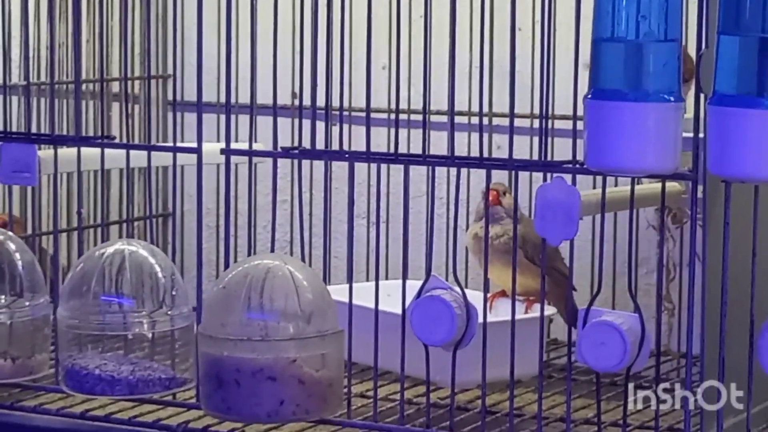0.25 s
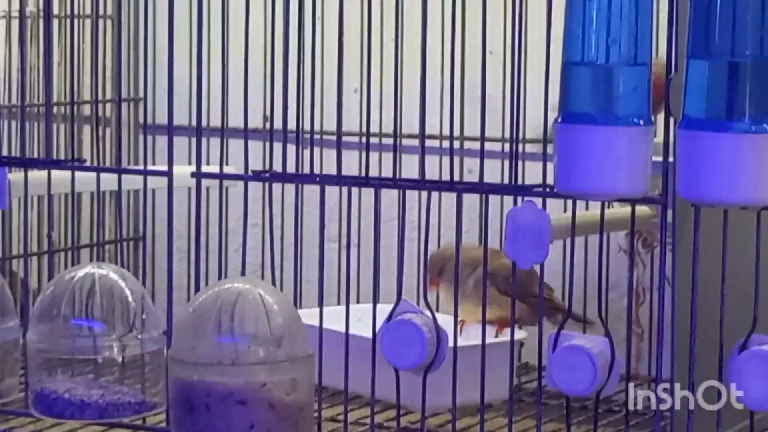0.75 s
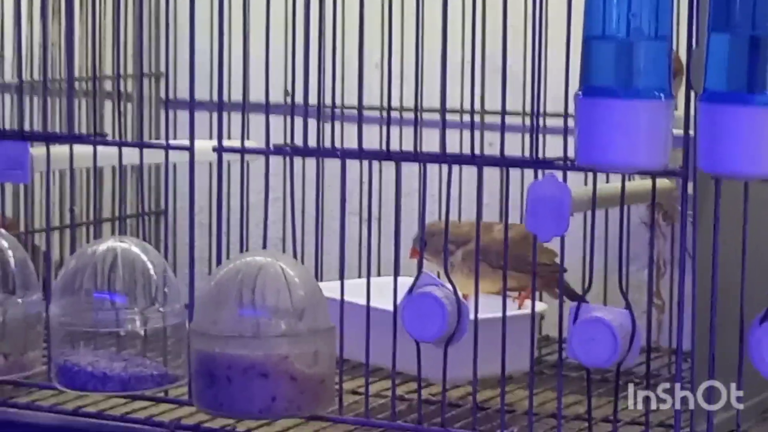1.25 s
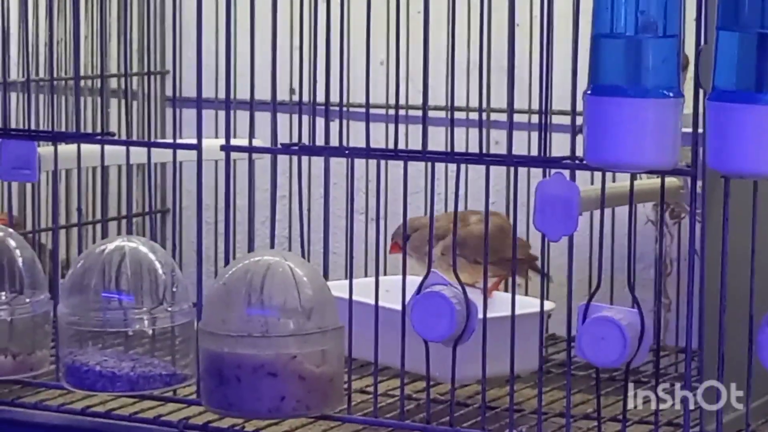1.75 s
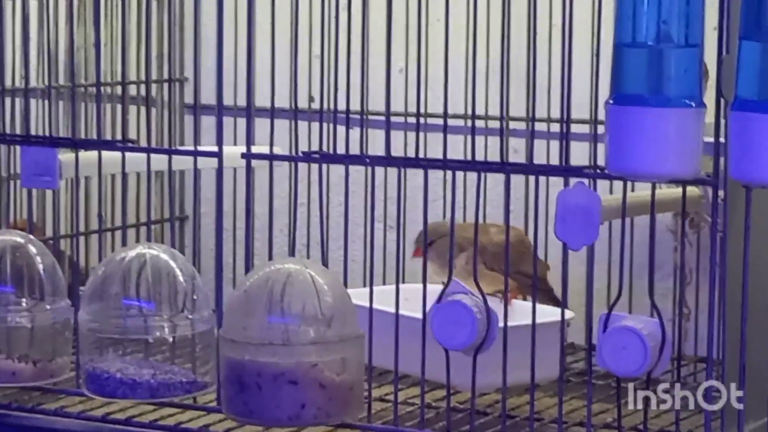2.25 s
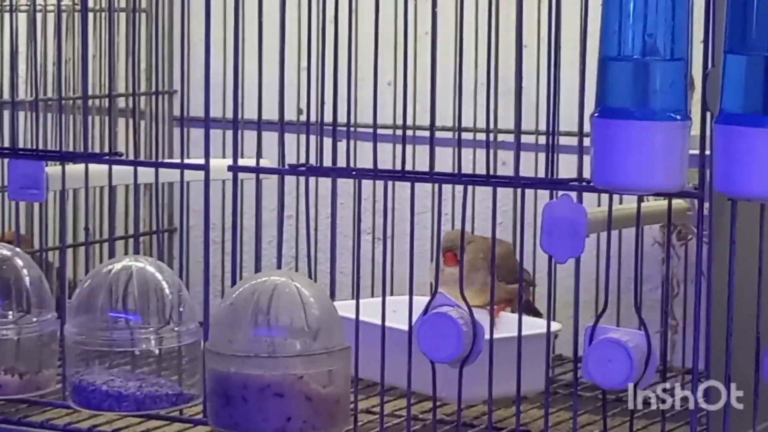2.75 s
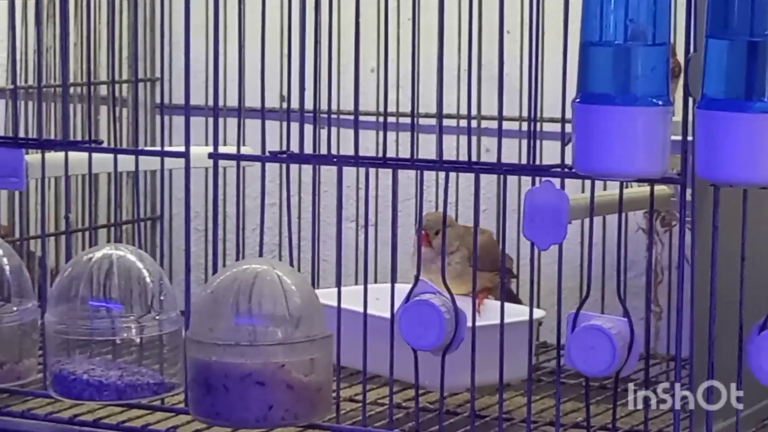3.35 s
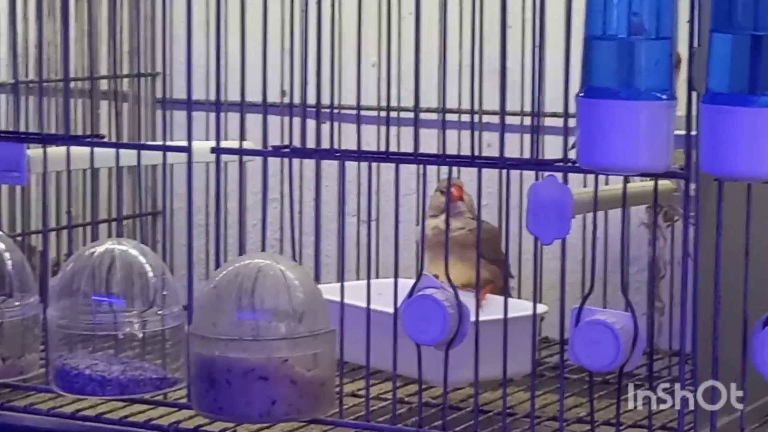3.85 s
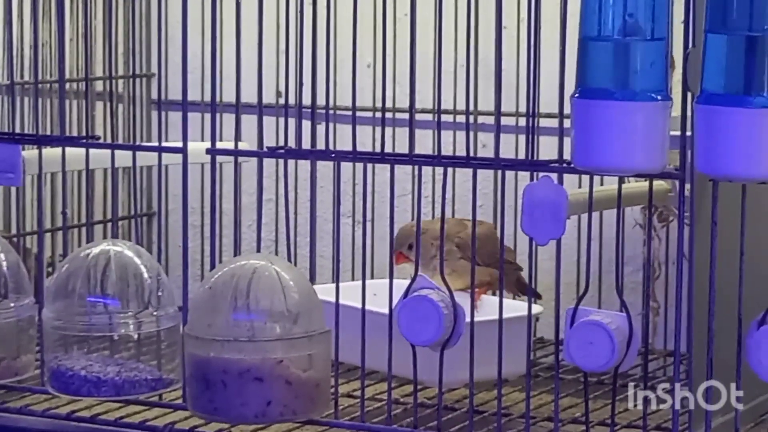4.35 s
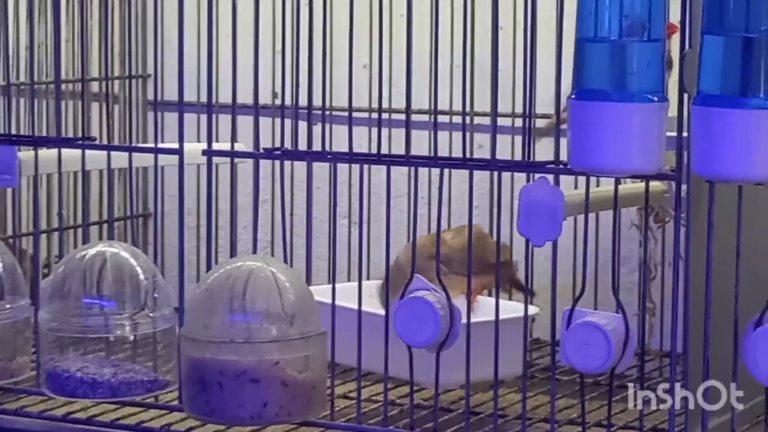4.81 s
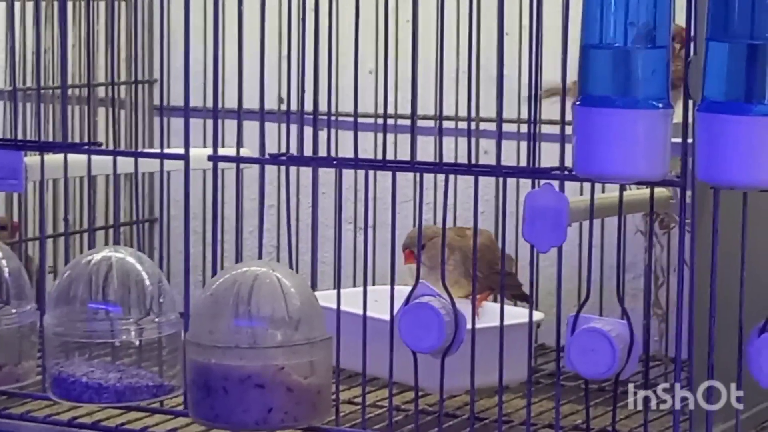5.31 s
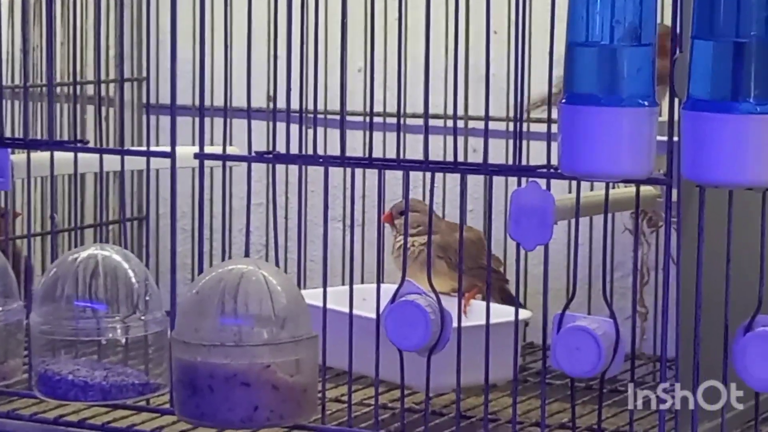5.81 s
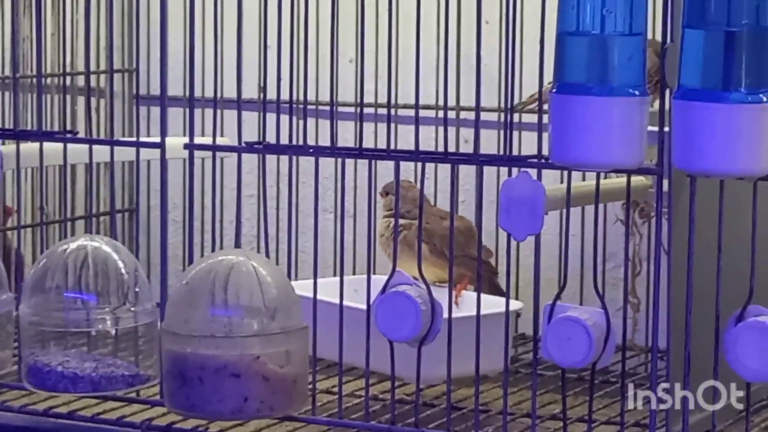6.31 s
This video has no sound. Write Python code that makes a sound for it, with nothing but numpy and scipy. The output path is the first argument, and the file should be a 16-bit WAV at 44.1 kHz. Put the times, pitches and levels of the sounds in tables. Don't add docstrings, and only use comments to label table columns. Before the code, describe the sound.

Several small finches call inside wire cages in a small hard-walled room. A short falling chirp opens, then soft distant chirps and a breathy phrase lead into two long nasal beeps with reedy answers. A sharp diving call follows, the phrase returns, then three more long beeps and a loud plunging cry. Later come softer chirps, claw ticks and feather rustles. Low mains hum and faint hiss continue throughout, picked up by a close stereo microphone.

```python
import sys
import numpy as np
from scipy import signal
from scipy.fft import rfft, irfft
from scipy.io import wavfile
from scipy.ndimage import uniform_filter1d

SR = 44100
rng = np.random.default_rng(int(sys.argv[2]) if len(sys.argv) > 2 else 0)


def bounce(signal):
    frames = np.transpose(np.atleast_2d(signal))
    limited = np.clip(frames, -1, 1)
    pcm = np.round(limited * 32767).astype(np.int16)
    wavfile.write(sys.argv[1], SR, pcm)


def amplitude_ratio(level_db):
    exponent = np.asarray(level_db, float) / 20
    return 10 ** exponent


N = 289734

# pitch_jitter_share, breath_db
ROUGHNESS = dict(long=(.0045, -11.5), chirp=(.006, -9), far=(.008, -8), answer=(.006, -10),
             falling=(.005, -10), song=(.024, -1))


def evened(x):
    return x / np.sqrt(np.mean(x ** 2) + 1e-20)


def read(points, hz):
    f, value = np.transpose(points)
    return np.interp(np.log(hz + 1), np.log(f + 1), value)


def add(mix, start_s, sound):
    part = mix[:, round(start_s * SR):][:, :sound.shape[1]]
    part += sound[:, :part.shape[1]]


def drift(size, span_s):
    width = max(int(span_s * SR), 1)
    once = uniform_filter1d(rng.standard_normal(size), width)
    return evened(uniform_filter1d(once, width))


def sided(x, pan_db):
    return np.array([x * amplitude_ratio(pan_db / 2), x * amplitude_ratio(-pan_db / 2)])


def placed(mix, direct_db, wet_db):
    # pitch_hz, t60_s
    decay = [(500, 0.15), (1500, 0.42), (4000, 0.345), (8000, 0.28), (14000, 0.09)]
    left_lag = 10
    taps = np.zeros((2, SR // 2))
    jitter = rng.integers(0, 20, (2, (SR // 2 - 101) // 20))
    at = np.arange(100, SR // 2 - 20, 20) + jitter
    np.put_along_axis(taps, at, rng.choice([-1., 1.], at.shape), 1)
    hz, t, z = signal.stft(taps, SR, nperseg=256)
    t60 = read(decay, hz)[:, None]
    tail = signal.istft(z * amplitude_ratio(-60 * t / t60) / np.sqrt(t60), SR, nperseg=256)[1]
    tail *= amplitude_ratio(wet_db) / np.linalg.norm(tail[0])
    tail[0, left_lag] += amplitude_ratio(direct_db)
    tail[1, 0] += amplitude_ratio(direct_db)
    return signal.fftconvolve(mix, tail, axes=1)[:, :N]


def shaped(calls, manner, offset_s=0, lift_db=0):
    # attack_s, attack_depth_db, fade_db_per_s, scoop_share, scoop_s,
    # left_right_db, first_beak_hz, last_beak_hz
    manners = dict( long=(.004, -1, -26, .08, .012, -3, 3900, 3900),
               chirp=(.022, -12, -150, .06, .018, -7, 2800, 2250),
               wide_chirp=(.045, -20, -60, .001, .01, -4, 4600, 3300),
               answer=(.025, -5, -130, .02, .02, -1, 2400, 2900),
               wide_answer=(.04, -10, -120, .01, .02, 2, 3500, 3500),
               falling=(.022, -5, -50, .001, .01, -4, 5100, 4500),
               lead=(.024, -10, -170, .001, .01, -2, 2800, 3100),
               song=(.02, -9, -150, .05, .015, -2, 2400, 3000),
               drop=(.014, -7, -210, .001, .01, -2, 4000, 2800),
               far=(.03, -6, -230, .05, .015, -8, 2300, 1950),
               wide_far=(.028, -12, -120, .05, .015, -7, 3400, 1950),
               faint=(.03, -8, -90, .001, .01, -2, 3200, 3100))
    attack_s, attack_db, fade_db, scoop, scoop_s, pan_db, beak_hz, last_beak_hz = manners[manner]
    out = []
    for start, length, db, hz, last_hz in calls:
        u = np.linspace(0, 1, num=40)
        t = u * length
        pitch = hz * (last_hz / hz) ** u * (1 - scoop * np.exp(-t / scoop_s))
        rise_db = attack_db * np.maximum(1 - t / attack_s, 0)
        effort_db = db + lift_db + rise_db + fade_db * np.maximum(t - attack_s, 0)
        beak = beak_hz + (last_beak_hz - beak_hz) * u
        out.append(np.transpose([offset_s + start + t, pitch, effort_db, pan_db + 0 * t, beak]))
    return out


def call(rows, throat, jitter, breath_db, late_db, beak_db=8):
    beak_width, flutter_db, droop = .16, 2.5, .05
    rise_s, fall_s, top_hz = .008, 0.0059, 16500
    s, *columns = np.transpose(rows)
    t = np.arange(s[0], s[-1], 1 / SR)
    hz, effort_db, pan_db, beak_hz = (np.interp(t, s, c) for c in columns)
    hz = hz * (1 - droop * np.exp((t - s[-1]) / .012))
    turn = 2 * np.pi * np.cumsum(hz * (1 + jitter * drift(len(t), 0.0031))) / SR
    k = np.arange(1, 1 + int(top_hz / hz.min()))[:, None]
    flutter = drift((len(k), len(t)), 0.01)
    beak = np.exp(-(np.log(k * hz / beak_hz) / beak_width) ** 2)
    opening_db = late_db * np.exp(-((t - s[0]) / .025) ** 2)
    shape_db = read(throat, k * hz) + beak_db * beak
    shape_db = shape_db - opening_db * (1 - beak) + flutter_db * flutter
    tone = evened((amplitude_ratio(shape_db) * (k * hz < top_hz) * np.cos(k * turn)).sum(0))
    puffs = rfft((1 + np.cos(turn)) * rng.standard_normal(len(t)))
    throat_gain = amplitude_ratio(read(throat, np.fft.rfftfreq(len(t), 1 / SR)))
    breath = evened(irfft(puffs * throat_gain, len(t)))
    edge = np.clip(np.minimum((t - s[0]) / rise_s, (s[-1] - t) / fall_s), 0, 1)
    return sided((tone + amplitude_ratio(breath_db) * breath) * amplitude_ratio(effort_db) * edge, pan_db.mean())


def flock(calls, throat, jitter, breath_db, direct_db, wet_db, late_db=3):
    mix = np.zeros((2, N))
    for rows in calls:
        add(mix, rows[0][0], call(rows, throat, jitter, breath_db, late_db))
    return placed(mix, direct_db, wet_db)


def hum():
    # pitch_hz, level_db
    lines = [(76, -56), (100, -50.5), (150, -48.5), (200, -60.5), (250, -63), (297, -60), (350, -60.5)]
    t, out = np.arange(N) / SR, np.zeros((2, N))
    port_phase, port_db = np.array([[0], [.2]]), np.array([[-.4], [.4]])
    for hz, db in lines:
        turn = 2 * np.pi * hz * t + 0.29 * drift(N, 0.046) + rng.uniform(0, 2 * np.pi)
        swell = np.sqrt(2) * amplitude_ratio(db + 1.8 * drift(N, 0.027))
        out += swell * np.sin(turn + port_phase) * amplitude_ratio(port_db)
    return out


def air():
    # pitch_hz, likeness_share
    likeness = [(30, 0.67), (100, 0.91), (300, 0.77), (700, 0.17), (3000, 0.9)]
    # pitch_hz, density_db_per_hz
    room_noise = [(25, -56), (38, -47), (52, -9), (80, -4.5), (120, -18.5), (160, -7), (250, -9.5),
                  (357, -16.5), (430, -20.5),
                  (600, -33), (1000, -34), (1450, -45), (2150, -38), (2800, -45.5), (4000, -54), (6000, -60),
            (8500, -55.5), (10500, -64), (13500, -58), (15300, -57), (16500, -72)]
    # pitch_hz, left_right_db
    balance = [(400, -.5), (1000, -4), (16000, -4)]
    level_db = -51
    frames, hz = N // 512 + 5, np.fft.rfftfreq(2048, 1 / SR)
    a, b, c, d, patches = rng.standard_normal((frames, 1025, 5)).T
    patches = evened(uniform_filter1d(uniform_filter1d(patches, 16, 0), 5, 1))
    same = np.clip(read(likeness, hz), -1, 1)[:, None]
    left = a + 1j * b
    z = np.array([left, same * left + np.sqrt(1 - same ** 2) * (c + 1j * d)])
    z *= amplitude_ratio(read(room_noise, hz)[:, None] + 2.7 * patches)
    z *= amplitude_ratio(np.array([.5, -.5])[:, None, None] * read(balance, hz)[:, None])
    return amplitude_ratio(level_db) * evened(signal.istft(z, nperseg=2048, noverlap=1536)[1][:, :N])


def soft_chirps():
    # start_s, length_s, effort_db, first_pitch_hz, last_pitch_hz
    plain = [
        (1.18, .1, -47, 588, 600),
        (2.884, .075, -37.5, 605, 490),
        (5.703, .09, -45, 588, 580),
        (6.545, .025, -52, 593, 575),
    ]
    # start_s, length_s, effort_db, first_pitch_hz, last_pitch_hz
    wide = [
        (.013, .062, -32.5, 585, 470),
    ]
    # pitch_hz, level_db
    throat = [(500, -36.5), (1100, -18), (1450, -25), (1900, -9.5), (2400, -8.5), (3500, -10), (5000, -20),
              (6500, -31.5), (8500, -31.5), (12500, -49), (15500, -41)]
    # direct_db, room_db
    perch = (-3, -3.5)
    calls = shaped(plain, "chirp") + shaped(wide, "wide_chirp")
    return flock(calls, throat, *ROUGHNESS["chirp"], *perch)


def ticks():
    # start_s, peak_db, brightness_hz, left_right_db
    taps = [(0.2402, -61, 5500, -5.0), (0.7783, -60, 5500, -8), (1.0354, -58, 5500, -2),
            (2.5494, -66, 5500, -2), (3.1902, -73, 5500, -4), (4.8839, -59, 5500, -4.0),
            (4.9269, -59, 5500, -2), (5.0635, -58, 5500, 2), (5.7069, -50, 5500, 0), (5.911, -66, 5460, -6),
            (6.0794, -59, 5500, -2.5), (6.1886, -70, 5500, -5.0), (6.2392, -66, 5500, -7),
            (6.271, -51, 5500, -9.0), (6.4284, -59, 5500, -3)]
    t, mix = np.arange(900) / SR, np.zeros((2, N))
    for s, db, hz, pan_db in taps:
        snap = np.sin(2 * np.pi * hz * t) * np.exp(-hz * t)
        rattle = 0.46 * np.diff(rng.standard_normal(901)) * np.exp(-t / 0.012)
        add(mix, s, sided(amplitude_ratio(db) * (snap + rattle), pan_db))
    return mix


def far_chirps():
    # start_s, length_s, effort_db, first_pitch_hz, last_pitch_hz
    plain = [
        (.89, .075, -45, 470, 490),
        (.985, .045, -47.5, 438, 408),
        (4.748, .065, -41.5, 452, 428),
        (6.035, .06, -48, 462, 442),
    ]
    # start_s, length_s, effort_db, first_pitch_hz, last_pitch_hz
    wide = [
        (.682, .065, -44.5, 513, 435),
        (3.13, .14, -54, 628, 620),
        (6.28, .11, -43, 480, 480),
    ]
    # start_s, length_s, effort_db, first_pitch_hz, last_pitch_hz
    faint = [
        (5.43, .2, -58, 646, 625),
    ]
    # pitch_hz, level_db
    throat = [(500, -33), (1000, -8), (1450, -18), (1800, 0), (2400, -3), (3800, -9.5), (4800, -29),
              (6500, -33), (8500, -24), (11000, -53)]
    calls = shaped(plain, "far") + shaped(wide, "wide_far") + shaped(faint, "faint")
    return flock(calls, throat, *ROUGHNESS["far"], direct_db=-5.5, wet_db=-5.5)


def song():
    # start_s (of the first full note), strength_db
    phrases = [
        (1.25, -1.5),
        (3.478, -.5),
    ]
    # start_s (in the phrase), length_s, effort_db, first_pitch_hz, last_pitch_hz
    opening = [
        (-.068, .065, -48, 1200, 1000),
        (0, .085, -43, 1190, 1000),
        (.097, .045, -43, 1030, 1030),
    ]
    # start_s (in the phrase), length_s, effort_db, first_pitch_hz, last_pitch_hz
    closing = [
        (.14, .085, -38, 1354, 930),
        (.23, .055, -39, 1390, 950),
    ]
    # pitch_hz, level_db
    throat = [(700, -26), (1000, -6), (1400, -29), (1800, -5.5), (2400, -10.5), (3800, -14), (5000, -15.5),
              (6300, -24.5), (8500, -27), (11000, -47), (15500, -44.5)]
    # direct_db, room_db
    perch = (-3, -2)
    calls = []
    for s, db in phrases:
        calls += shaped(opening, "song", s, db)
        calls += shaped(closing, "drop", s, db)
    return flock(calls, throat, *ROUGHNESS["song"], *perch)


def long_calls():
    # start_s, length_s, effort_db, first_pitch_hz, last_pitch_hz
    rows = [
        (1.589, .205, -31, 977, 986),
        (1.863, .19, -30.5, 953, 991),
        (3.818, .205, -32.5, 1009, 1015),
        (4.077, .19, -31.5, 973, 983),
        (4.34, .215, -30.5, 962, 984),
    ]
    # pitch_hz, level_db
    throat = [(700, -28), (1000, -11), (1400, -32.5), (1950, -14), (3000, -11.5), (4000, -13), (5000, -20),
              (6300, -31), (9000, -29), (13300, -43), (15500, -21)]
    calls = shaped(rows, "long")
    return flock(calls, throat, *ROUGHNESS["long"], direct_db=-2, wet_db=-5.5, late_db=20)


def answers():
    # start_s, length_s, effort_db, first_pitch_hz, last_pitch_hz
    plain = [
        (1.72, .07, -39.5, 600, 550),
        (1.99, .09, -38, 572, 586),
        (3.775, .085, -41, 468, 517),
        (4.2, .08, -36.5, 568, 598),
        (4.47, .06, -35.5, 584, 578),
    ]
    # start_s, length_s, effort_db, first_pitch_hz, last_pitch_hz
    wide = [
        (1.66, .13, -39, 495, 546),
        (3.9, .11, -36, 508, 480),
        (3.93, .09, -39, 628, 608),
    ]
    # pitch_hz, level_db
    throat = [(600, -33), (1170, -10), (1700, -20), (2350, -2.5), (3500, -7.5), (4600, -12), (6300, -33),
              (9000, -27.5), (15500, -42.5)]
    # direct_db, room_db
    perch = (-1, -1)
    calls = shaped(plain, "answer") + shaped(wide, "wide_answer")
    return flock(calls, throat, *ROUGHNESS["answer"], *perch)


def falling_calls():
    # start_s, length_s, effort_db, first_pitch_hz, last_pitch_hz
    falls = [
        (2.607, .13, -35.5, 1320, 659),
        (5.185, .135, -32, 1335, 619),
        (5.26, .042, -34, 1320, 1100),
    ]
    # start_s, length_s, effort_db, first_pitch_hz, last_pitch_hz
    leads = [
        (2.586, .035, -37, 1125, 1035),
        (4.546, .1, -28.5, 1150, 447),
        (5.162, .032, -37.5, 1150, 1075),
    ]
    # pitch_hz, level_db
    throat = [(600, -22.5), (1100, -9), (1500, -10.5), (2300, -4), (2900, -3.5), (3600, -2.5), (4250, -10),
              (5000, -6), (5700, -17), (6400, -22.5), (9000, -26.5), (11300, -29), (12500, -55.5),
              (14000, -51.5), (15300, -29)]
    # direct_db, room_db
    perch = (-3.5, -3)
    calls = shaped(falls, "falling") + shaped(leads, "lead")
    return flock(calls, throat, *ROUGHNESS["falling"], *perch)


def whistle():
    # time_s, pitch_hz, level_db
    path = [
        (4.77, 5250, -75),
        (4.875, 4810, -77),
        (4.99, 4800, -81),
        (5.16, 4500, -92),
    ]
    s, hz, db = np.transpose(path)
    t, mix = np.arange(s[0], s[-1], 1 / SR), np.zeros((2, N))
    turn = 2 * np.pi * np.cumsum(np.interp(t, s, hz)) / SR
    tone = np.sqrt(2) * np.sin(turn) * signal.windows.tukey(len(t), .15)
    add(mix, s[0], sided(tone * amplitude_ratio(np.interp(t, s, db)), 0))
    return mix


def rustles():
    # start_s, length_s, level_db, thud_share_db
    shakes = [
        (4.87, .09, -69, -12),
        (5.33, .14, -59, -13),
        (5.7, .11, -54, -15),
        (6.26, .13, -59, 6),
        (6.425, .055, -72, 4),
    ]
    # pitch_hz, level_db
    feathers = [(1000, 0), (3000, -10.5), (6000, -4), (8500, 1.5), (11000, -11), (13000, -2),
                (15300, -17.5), (16500, -41)]
    mix = np.zeros((2, N))
    for start, length, db, thud_db in shakes:
        t = np.arange(0, length, 1 / SR)
        hz = np.fft.rfftfreq(len(t), 1 / SR)
        grains = rng.standard_normal((2, len(t))) * amplitude_ratio(1.3 * drift(len(t), 0.0018))
        bright = evened(irfft(rfft(grains) * amplitude_ratio(read(feathers, hz)), len(t)))
        thud = evened(irfft(rfft(grains) / (1 + (hz / 800) ** 4) * (hz > 150), len(t)))
        shake_db = np.interp(t / length, [0, .25, 1], [-12, 0, -15])
        edge = signal.windows.tukey(len(t), .15)
        add(mix, start, amplitude_ratio(db + shake_db) * edge * (bright + amplitude_ratio(thud_db) * thud))
    return mix


def scene():
    birds = soft_chirps() + far_chirps() + song()
    birds += long_calls() + answers() + falling_calls()
    cage = placed(ticks() + whistle() + rustles(), direct_db=-1.5, wet_db=-5)
    return hum() + air() + birds + cage


def band_limit(x):
    return signal.sosfilt(signal.butter(12, 16780, fs=SR, output="sos"), x)


def record(dry):
    highpass = signal.butter(4, 900, "high", fs=SR, output="sos")
    treble = signal.sosfilt(highpass, dry.mean(0))
    loud_db = 10 * np.log10(abs(uniform_filter1d(treble ** 2, 5000)) + 1e-12)
    lift_db = 3.8 * np.clip((loud_db + 59.5) / 25, 0, 1)
    lowpass = signal.ellip(8, .5, 60, 16000, fs=SR, output="sos")
    band = signal.sosfilt(lowpass, dry)
    return band_limit(band * amplitude_ratio(lift_db - 1.5))


dry = scene()
out = record(dry)
bounce(out)
```